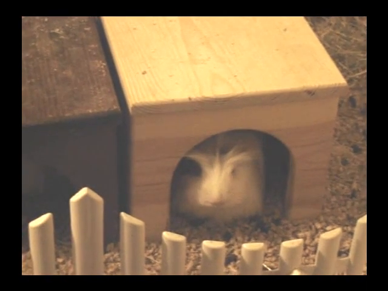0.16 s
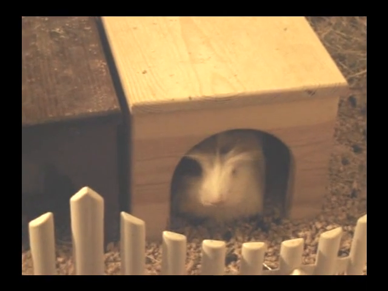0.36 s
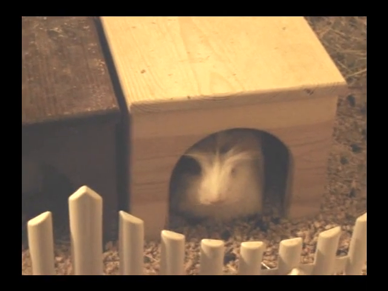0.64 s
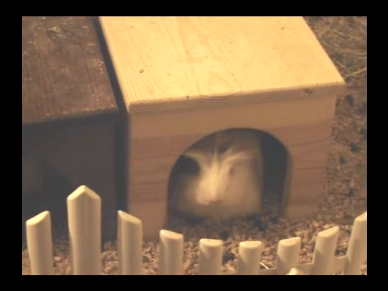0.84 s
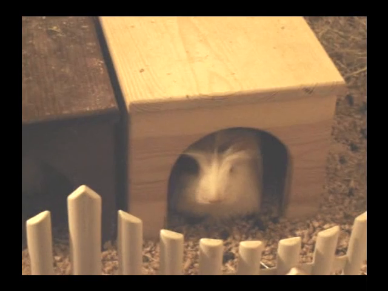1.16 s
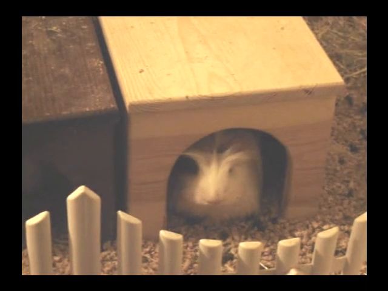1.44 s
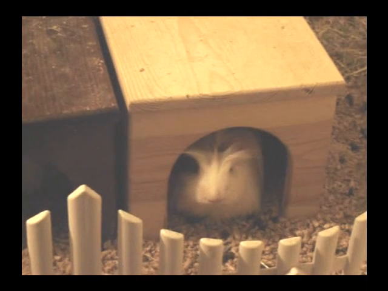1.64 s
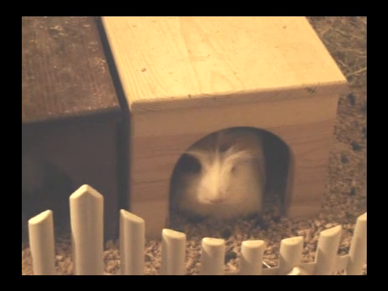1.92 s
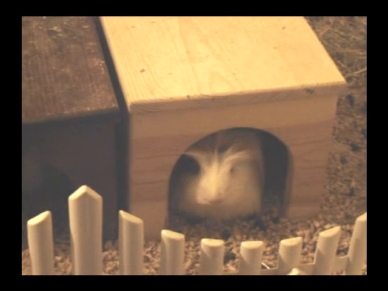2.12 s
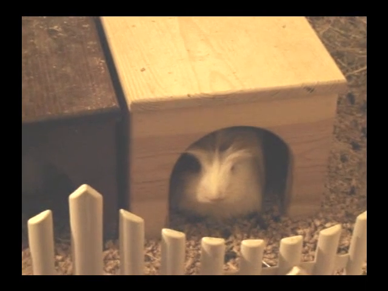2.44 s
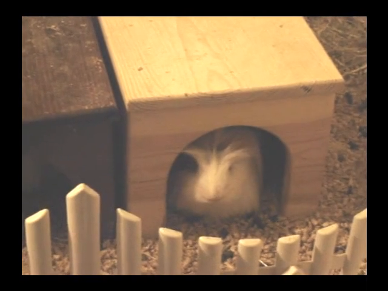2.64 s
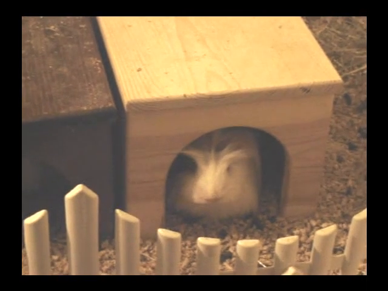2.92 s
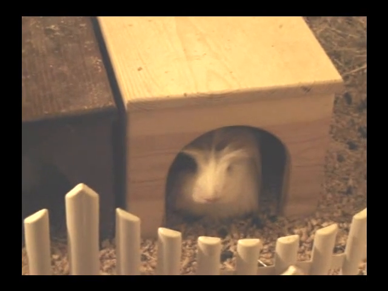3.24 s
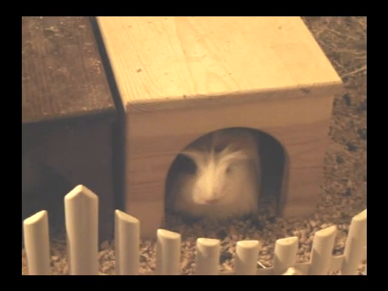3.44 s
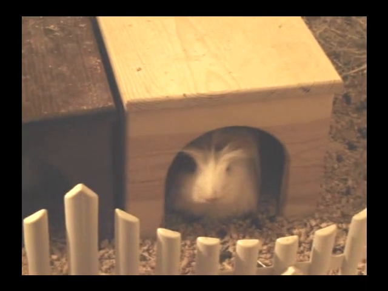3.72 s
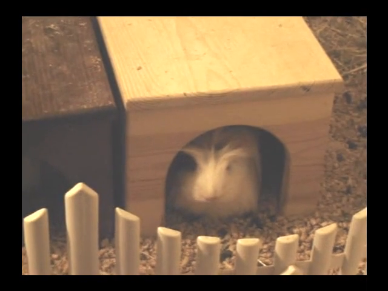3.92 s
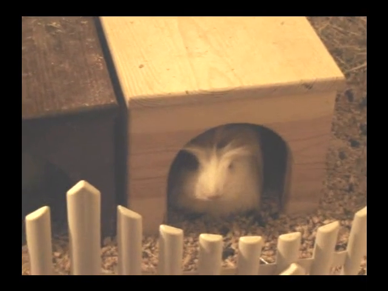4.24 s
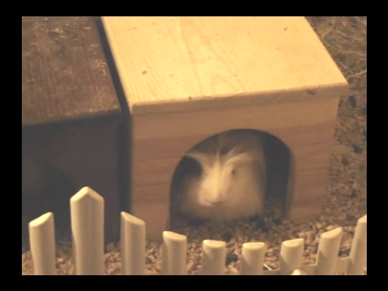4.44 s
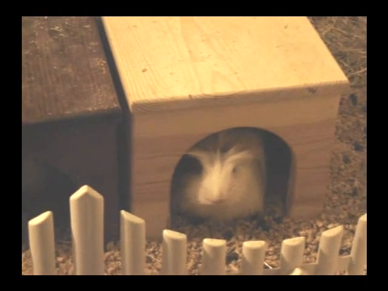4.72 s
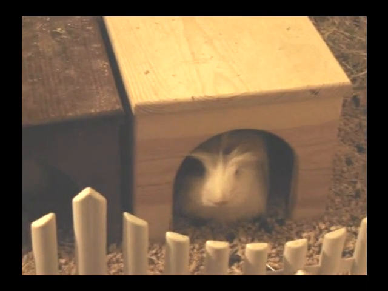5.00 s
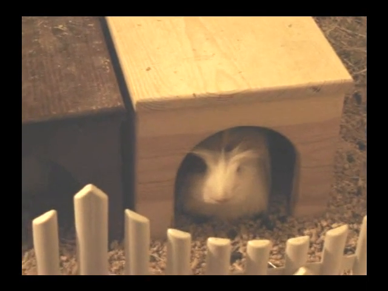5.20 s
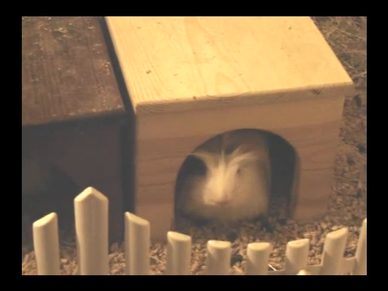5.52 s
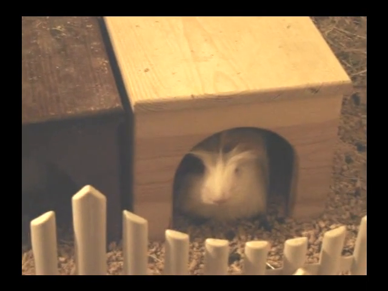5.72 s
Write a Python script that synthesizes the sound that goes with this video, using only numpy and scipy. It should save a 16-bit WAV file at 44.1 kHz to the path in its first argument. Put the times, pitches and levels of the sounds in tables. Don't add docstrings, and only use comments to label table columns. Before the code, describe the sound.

Soft breathy peeps and small dry ticks open over steady hum and hiss. Six sharp bird-like chirps follow in regular rhythm, each a tiny downward whistle with bright overtones and a short boxy echo. About a second's gap, some clicks and a quiet peep lead into five brighter loud chirps interleaved with gentler ones. The indoor recording is lo-fi, thin and slightly gritty on top, nearly mono; the background continues to the end.

```python
import sys
import numpy as np
from scipy import signal
from scipy.io import wavfile
from scipy.ndimage import uniform_filter1d, minimum_filter1d

SR = 44100
rng = np.random.default_rng(int(sys.argv[2]) if len(sys.argv) > 2 else 0)


def boost_factor(decibels):
    exponent = np.asarray(decibels, float) / 20
    return 10 ** exponent


def materialize(psi):
    bounded = np.clip(np.atleast_2d(psi).T, -1, 1)
    quanta = np.round(bounded * 32767).astype(np.int16)
    wavfile.write(sys.argv[1], SR, quanta)


N = 258688

BREATH_DB = -26
LATE_S = 0.005
HOLD_S = 0.013
LEAD_IN_S = 0.0025


def evened(x):
    return x / np.sqrt(np.mean(x ** 2) + 1e-20)


def read(points, hz):
    f, value = np.transpose(points)
    return np.interp(np.log(hz + 1), np.log(f + 1), value)


def add(mix, start_s, sound):
    part = mix[round(start_s * SR):][:len(sound)]
    part += sound[:len(part)]


def wander(count, hz):
    settle = SR // 2
    noise = rng.standard_normal(count + settle)
    return evened(signal.lfilter(*signal.butter(2, hz, fs=SR), noise)[settle:])


def hiss():
    # (frequency [Hz], density [dB per Hz])
    colour = [(30, -3), (55, -10.5), (100, -13.5), (250, -5), (500, -7), (1200, -10.5), (1700, -16.5),
              (2400, -22.5), (5000, -30.5), (9200, -33.5)]
    # (time [s], level [dB])
    course = [(0.0, -41), (0.52, -40.5), (1.91, -40.5), (4.44, -40), (5.08, -38), (5.87, -38.5)]
    frames, hz = N // 256 + 5, np.fft.rfftfreq(1024, 1 / SR)
    real, imag, patches = rng.standard_normal((frames, 513, 3)).T
    patches = uniform_filter1d(patches, size=10, axis=0)
    patches = evened(uniform_filter1d(patches, size=10, axis=1))
    z = (real + 1j * imag) * boost_factor(read(colour, hz)[:, None] + 0.54 * patches)
    noise = evened(signal.istft(z, nperseg=1024, noverlap=768)[1][:N])
    s, db = np.transpose(course)
    return boost_factor(np.interp(np.arange(N) / SR, s, db) + 1.0) * noise


def fan():
    # (order [1], level [dB])
    blades = [(3, -51), (5, -58), (6, -42.5), (8, -51.5), (9, -56.5), (10, -58), (11, -47.5), (12, -49),
              (15, -50), (20, -52), (22, -54.5), (30, -55)]
    shaft_hz = 24.155 * (1 + 0.00812 * wander(N, hz=3.23))
    angle = 2 * np.pi * np.cumsum(shaft_hz) / SR
    hum = np.zeros(N)
    for order, db in blades:
        level = boost_factor(db + 1.9 * wander(N, hz=9.4))
        phase = 1.1 * wander(N, hz=1.2) + 2 * np.pi * rng.random()
        hum += level * np.sin(order * angle + phase)
    return hum


def room(x):
    # (delay [s], level [dB])
    hut = [(.0021, -12), (.0047, -7.5), (.0085, -4), (.013, -12), (.019, -8), (.027, -9)]
    # (frequency [Hz], t60 [s])
    decay = [(1500, 0.21), (2500, 0.31), (5000, 0.32), (7500, 0.25), (10000, 0.23)]
    # (frequency [Hz], level [dB])
    tone = [(1700, -9.5), (2500, 4.5), (3500, 1), (4300, -4), (5000, -5.5), (6200, 1), (7500, -3.5),
            (10000, -2)]
    taps = np.zeros(SR // 2)
    at = np.arange(0, len(taps) - 20, 20)
    taps[at + rng.integers(0, 20, len(at))] = rng.choice([-1., 1.], len(at))
    taps *= np.clip(np.arange(len(taps)) / SR / 0.022, 0, 1) ** 3
    hz, t, z = signal.stft(taps, SR, nperseg=256)
    tail_db = read(tone, hz)[:, None] - 60 * t / read(decay, hz)[:, None]
    tail = signal.istft(z * boost_factor(tail_db), SR, nperseg=256)[1]
    tail *= boost_factor(-10.5) / np.linalg.norm(tail)
    smear = signal.firwin(numtaps=15, cutoff=4700, fs=SR)
    for k, (delay_s, db) in enumerate(hut):
        add(tail, delay_s, (-1) ** k * boost_factor(db) * smear)
    return x + signal.fftconvolve(x, tail)[:N]


def tick(peak_db, ring_hz, t60_s):
    t = np.arange(1500) / SR
    ring = np.sin(2 * np.pi * ring_hz * t) * boost_factor(-60 * t / 0.0077)
    crackle = np.diff(rng.standard_normal(len(t) + 1)) * boost_factor(-60 * t / t60_s)
    return boost_factor(peak_db) * (ring + 0.5 * crackle)


def chirp(start_s, t, pitch_hz, level_db, mouth, shut, spent, air_db):
    leak_db = [-20, -20, -43]
    rasp_db = [-11, -12.5]
    levels = []
    for k, (hz, width_hz, db) in enumerate(mouth, 1):
        passed = boost_factor(db) / (1 + ((k * pitch_hz - hz) / width_hz) ** 2) ** 2 + boost_factor(leak_db[k - 1])
        if k == 1:
            passed = passed + boost_factor(-15) * np.clip((pitch_hz - hz) / width_hz, 0, 1)
        partial_db = level_db + 20 * np.log10(passed)
        if k == 3:
            shut = np.interp(t - 0.0029, t, shut)
        if k > 1:
            partial_db = partial_db - 54.5 * shut - 26 * spent ** 3
        levels.append(partial_db)
    levels += [levels[2] - 15, levels[2] - 33.5]
    angle = 2 * np.pi * np.cumsum(pitch_hz) / SR
    out = np.zeros(len(t))
    for k, db in enumerate(levels, 1):
        flutter = 1 + boost_factor(air_db if k > 1 else BREATH_DB) * wander(len(t), hz=840)
        flutter = flutter * boost_factor(1.33 * wander(len(t), hz=73))
        wave = np.sin(k * angle + 2 * np.pi * rng.random())
        out += np.sqrt(2) * boost_factor(db) * flutter * wave * (k * pitch_hz < 11000)
        if k <= len(rasp_db):
            rasp = boost_factor(db + rasp_db[k - 1] - 20 * t / 0.056) * wander(len(t), hz=250)
            out += rasp * np.sin(1.14 * k * angle)
    edges = np.clip(np.minimum((t - t[0]) / 0.0014, (t[-1] - t) / 0.0041), 0, 1)
    return start_s + t[0], out * edges ** 2


def soft(start_s, length_s, level_db, lead_hz, bottom_hz, mouth, air_db):
    t = np.arange(-LEAD_IN_S, length_s + HOLD_S, 1 / SR)
    pitch_hz = bottom_hz + lead_hz * np.exp(-np.maximum(t, 0) / 0.014)
    shut = np.clip(1 - t / LATE_S, 0, 1) ** 2
    spent = np.maximum(t / length_s, 0) ** 2
    return chirp(start_s, t, pitch_hz, level_db, mouth, shut, spent, air_db)


def loud(start_s, sag_s, level_db, lead_hz, bottom_hz, mouth, plateau_hz, bend, settle_s, open_hz):
    break_hz, slide_s, landing_hz = 2325, 0.014, 110
    drop_hz = break_hz - bottom_hz
    after_s = HOLD_S + 4e-5 * max(drop_hz, 0)
    t = np.arange(-LEAD_IN_S, sag_s + after_s, 1 / SR)
    pitch_hz = plateau_hz + lead_hz * np.exp(-np.maximum(t, 0) / settle_s)
    pitch_hz = pitch_hz - (plateau_hz - break_hz) * np.clip(t / sag_s, 0, 1) ** bend
    pitch_hz = pitch_hz - drop_hz / slide_s * np.maximum(t - sag_s, 0)
    pitch_hz = bottom_hz + landing_hz * np.logaddexp(0, (pitch_hz - bottom_hz) / landing_hz)
    pitch_hz = uniform_filter1d(pitch_hz, size=200, mode="nearest")
    unsettled = np.clip((pitch_hz - open_hz) / 60, 0, 1)
    shut = np.maximum(unsettled, np.clip(1 - t / LATE_S, 0, 1) ** 2)
    spent = np.maximum(t - sag_s, 0) / after_s
    return chirp(start_s, t, pitch_hz, level_db, mouth, shut, spent, BREATH_DB)


def scene():
    # (start [s], sag [s], level [dB], sharp start [Hz], bottom [Hz])
    first_run = [(.981, .038, -19, 380, 2130), (1.255, .034, -18, 101, 2040),
                 (1.515, .034, -17, 168.7, 2155), (1.784, .024, -18.5, 204, 1670),
                 (2.019, .030, -16, 149.7, 2090), (2.271, 0.024, -18, 246, 1672)]
    # (start [s], sag [s], level [dB], sharp start [Hz], bottom [Hz])
    second_run = [(3.464, 0.023, -20, 116, 1642), (3.936, .021, -21.5, 103, 1757),
                  (4.385, 0.016, -19.5, 110, 1536), (4.869, .026, -22, 31.7, 1810),
                  (5.1, .026, -18, 434, 1492)]
    # (start [s], length [s], level [dB], sharp start [Hz], bottom [Hz])
    mutters = [
        (0.305, 0.024, -33, 172, 2016),
        (0.542, 0.027, -41, 200, 2056),
        (3.268, 0.027, -32.5, 198, 2552),
        (4.148, 0.04, -33.5, 662, 2228),
        (4.619, 0.023, -32, 647, 2190),
    ]
    # start [s], length [s], level [dB], sharp start [Hz], bottom [Hz]
    hook = (3.698, 0.064, -25.5, 719, 2192.5)
    # (centre [Hz], half width [Hz], level [dB])
    first_mouth = [(2391, 165, -0.2), (5047, 644, 0.5), (7295, 590, -6)]
    # (centre [Hz], half width [Hz], level [dB])
    second_mouth = [(2526, 420, -1.5), (5200, 850, 0), (7240, 690, 2.75)]
    # (centre [Hz], half width [Hz], level [dB])
    soft_mouth = [(2290, 1400, -2.5), (4740, 500, -6.5), (7550, 1160, -9.5)]
    # (centre [Hz], half width [Hz], level [dB])
    hook_mouth = [(2415, 230, -1), (4940, 350, -1.5), (7150, 380, -0.5)]
    # (time [s], peak [dB], ring [Hz], t60 [s])
    ticks = [(0.1955, -32.5, 3900, 0.027), (0.5195, -38, 3870, 0.017), (0.732, -38, 3160, 0.026),
             (0.7687, -38, 3870, 0.039), (2.9482, -33.5, 6960, 0.023), (3.1968, -27.5, 3980, 0.015),
             (3.2295, -32, 3180, 0.022), (4.6023, -27.5, 4000, 0.023)]
    # (time [s], peak [dB], ring [Hz], t60 [s])
    smacks = [(.966, -38, 3800, 0.08), (1.244, -38, 4000, 0.03), (1.499, -39, 3760, 0.045),
              (1.767, -35, 3630, 0.037), (2.005, -30.5, 3780, 0.018), (2.262, -54, 3330, 0.027),
              (3.445, -47, 3500, 0.029), (4.375, -42, 3550, 0.014), (4.607, -44, 4240, 0.03),
              (4.856, -33, 3940, 0.022)]
    near = np.zeros(N)
    for row in first_run:
        add(near, *loud(*row, first_mouth, plateau_hz=2555, bend=2.3, settle_s=0.0046, open_hz=2600))
    for row in second_run:
        add(near, *loud(*row, second_mouth, plateau_hz=2660, bend=1.9, settle_s=0.007, open_hz=2670))
    for row in mutters:
        add(near, *soft(*row, soft_mouth, air_db=-9))
    add(near, *soft(*hook, hook_mouth, BREATH_DB))
    for start_s, *row in [*ticks, *smacks]:
        add(near, start_s, tick(*row))
    floor = signal.lfilter(*signal.butter(4, 47, "high", fs=SR), hiss())
    return np.tile(room(near) + floor + fan(), (2, 1))


def per_block(power, size):
    rows, columns = -(-np.array(power.shape) // [5, size])
    spare = ((0, rows * 5 - power.shape[0]), (0, columns * size - power.shape[1]))
    padded = np.pad(power, spare, mode="edge")
    means = padded.reshape(rows, 5, columns, size).mean((1, 3))
    return np.kron(means, np.ones((5, size)))[:power.shape[0], :power.shape[1]]


def thrifty_link(x):
    lead = 1024 - 160
    frame = dict(window="cosine", nperseg=256, noverlap=128)
    hz, t, z = signal.stft(np.pad(x, (lead, 0)), SR, **frame)
    hz = hz[:, None]
    grouped = per_block(abs(z) ** 2, size=2)
    recent = -minimum_filter1d(-grouped, size=25, axis=1, origin=12)
    coming = -minimum_filter1d(-grouped, size=9, axis=1, origin=-4)
    noise = rng.standard_normal(z.shape) + 1j * rng.standard_normal(z.shape)
    noise = np.sqrt(grouped / 2) * noise * boost_factor(1.0)
    dying = (grouped < recent * boost_factor(-14)) & (grouped > recent * boost_factor(-60))
    z = np.where(dying & (hz > 5900) | (hz > 8900), noise, z)
    flicker_db = -4.0 * rng.exponential(1, len(t)) + 3
    z = z * np.where(dying & (hz > 4200), boost_factor(flicker_db), 1)
    luck_db = 14 * np.log10(per_block(rng.exponential(1, z.shape), size=8))
    before_loud = grouped < coming * boost_factor(-56 + 9.0 * luck_db)
    z = z * ~(before_loud & (hz > 2300) & (abs(z) ** 2 < boost_factor(-140)))
    thrift_db = read([(1500, -18), (2500, -6.5), (5000, -4), (9000, -1.0)], hz)
    step = np.sqrt(per_block(abs(z) ** 2, size=8)) * boost_factor(thrift_db + luck_db) + 1e-9
    z = step * (np.round(z.real / step) + 1j * np.round(z.imag / step))
    return signal.istft(z, SR, **frame)[1][lead:][:N]


def band_limit(x):
    return signal.sosfilt(signal.butter(12, 11330, fs=SR, output="sos"), x)


def record(dry):
    # (frequency [Hz], gain [dB])
    edge = [(9600, 0), (10200, -11.5), (10800, -21), (11300, -65)]
    frame = dict(nperseg=512, noverlap=384)
    hz, t, z = signal.stft(thrifty_link(dry[0]), SR, **frame)
    z = z * boost_factor(np.maximum(read(edge, hz), -90))[:, None]
    blocks = rng.random((len(hz) // 12 + 1, len(t) // 8 + 1))
    stray = np.kron(blocks < .13, np.ones((12, 8)))[:len(hz), :len(t)]
    stray_db = read([(300, -32.5), (2500, -18), (5000, -9.0), (9000, -8)], hz)
    stray = stray * boost_factor(stray_db)[:, None]
    turned = z * stray * np.exp(2j * np.pi * rng.random(z.shape))
    side = signal.istft(turned, SR, **frame)[1][:N]
    mid = signal.istft(z, SR, **frame)[1][:N]
    return band_limit(np.array([mid + side, mid - side]))


dry = scene()
out = record(dry)
materialize(out)
```